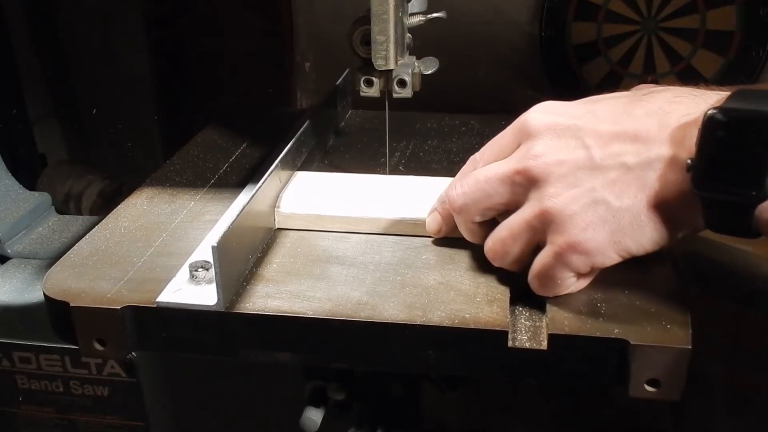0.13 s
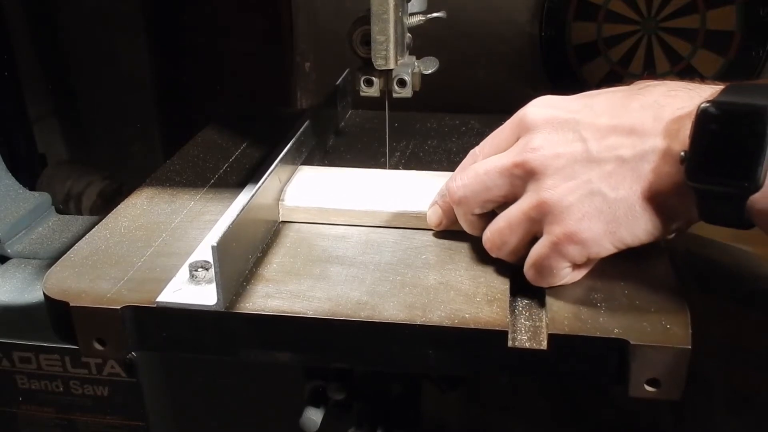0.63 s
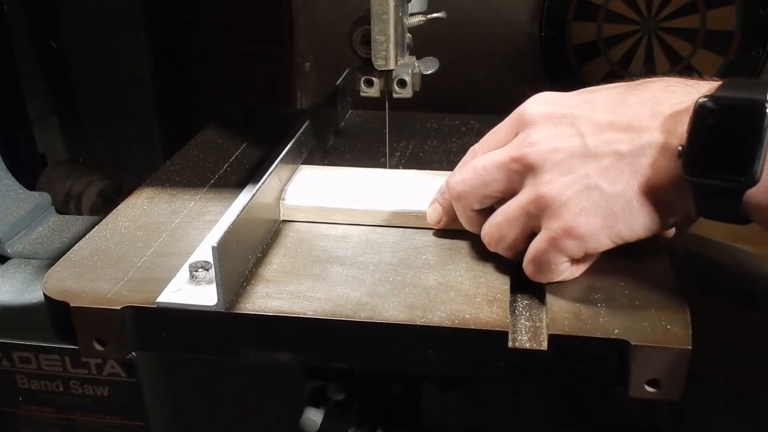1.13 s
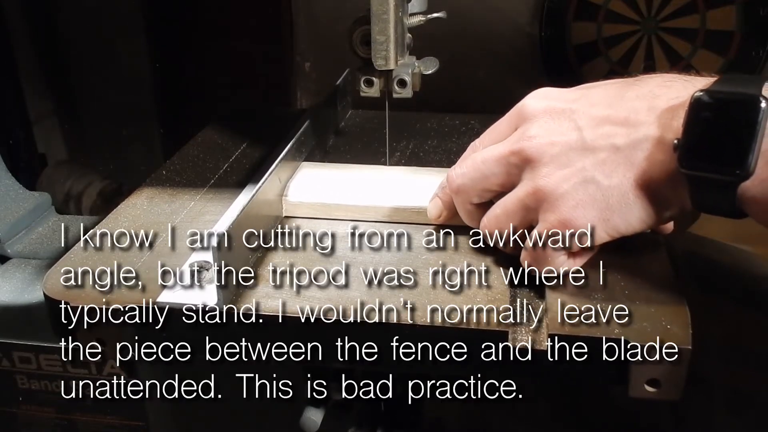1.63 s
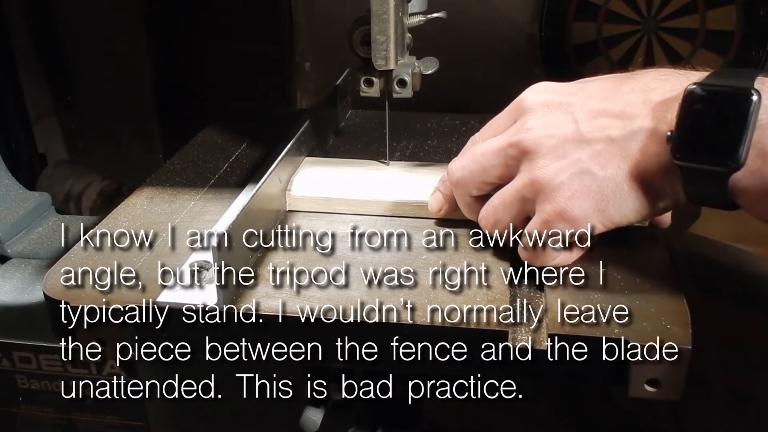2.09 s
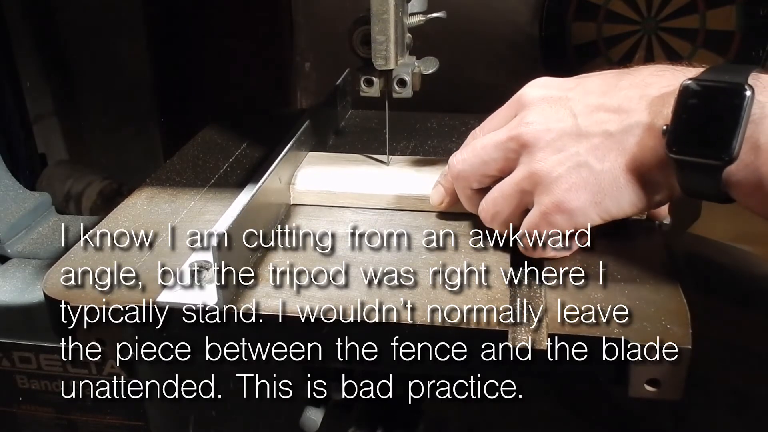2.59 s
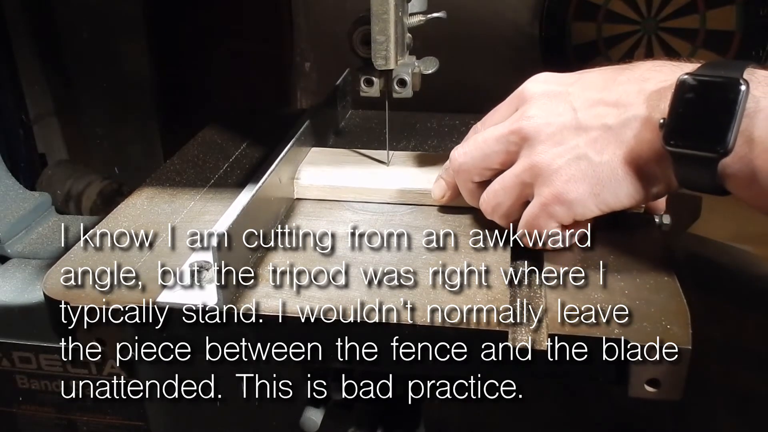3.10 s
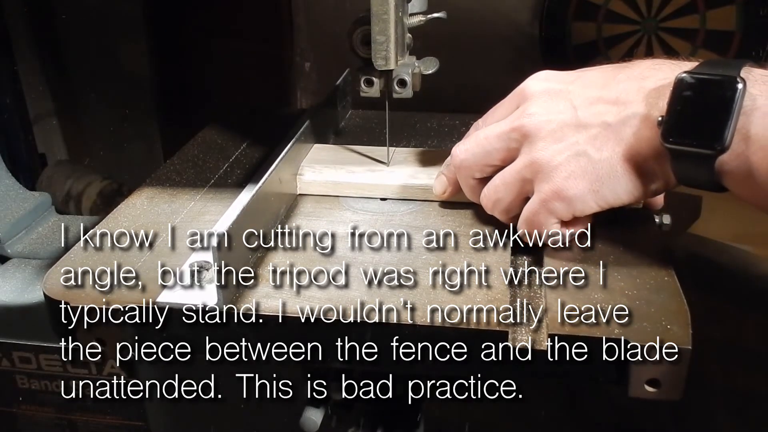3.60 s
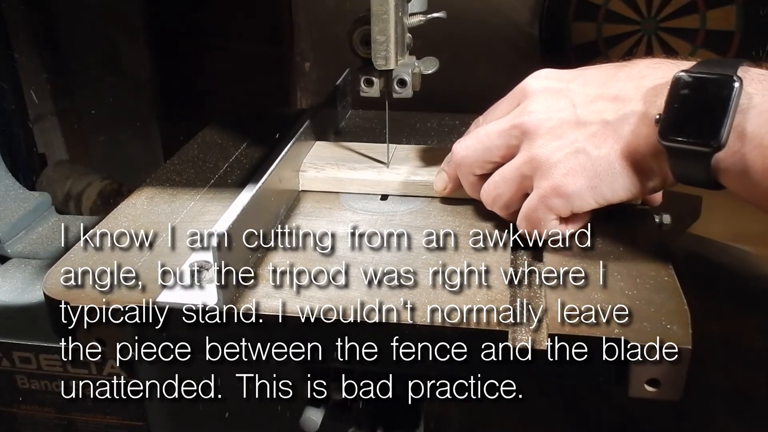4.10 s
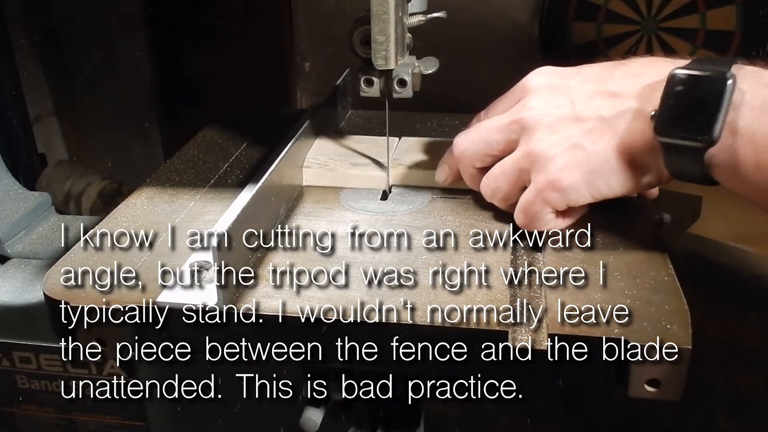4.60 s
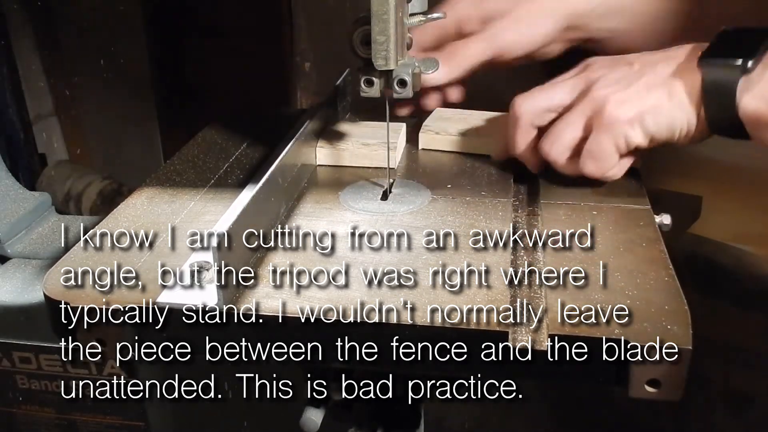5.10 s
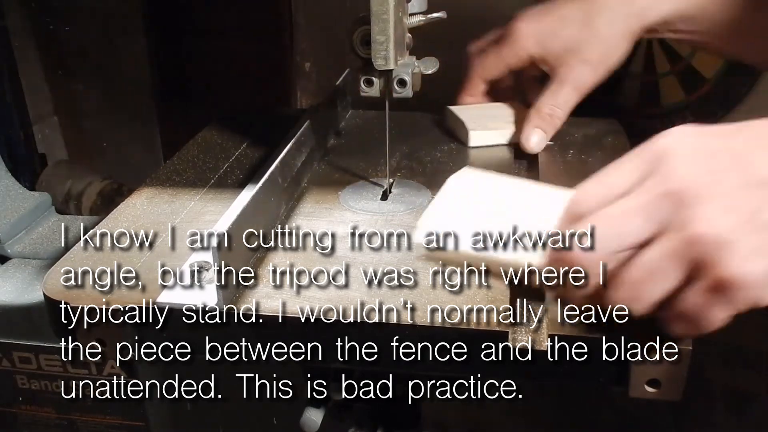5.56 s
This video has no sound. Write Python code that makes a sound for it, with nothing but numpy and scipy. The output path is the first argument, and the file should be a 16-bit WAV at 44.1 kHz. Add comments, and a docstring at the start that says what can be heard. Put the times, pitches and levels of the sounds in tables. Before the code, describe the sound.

A short swelling hum and rattly rumble of a small band saw, then a sudden long cut through wood: harsh, hissy tearing, shifting squeals and a fast flutter. The motor sinks behind it. A faint low groan comes just before the piece separates. The rasp cuts off with a short ring, the free-running machine grows louder again, and wood lightly taps the metal table. Close stereo microphone, dry room, treble slightly left.

```python
"""First a small band saw runs free: motor hum and wheel rumble ring in its frame and table, and their level
swells up. A wooden block is pushed through the blade: the teeth whine and rasp while the rumble ducks at once.
Late in the cut the block groans; then the cut rings out, the rumble's level swells again and wood taps the
table. Rumble, rasp and taps are filtered noise and ringing clicks; hum, whine and groan are wavering sines."""
import sys
import numpy as np
from scipy import signal
from scipy.fft import rfft, irfft, next_fast_len
from scipy.io import wavfile
from scipy.ndimage import uniform_filter1d

SR = 44100
rng = np.random.default_rng(int(sys.argv[2]) if len(sys.argv) > 2 else 0)


def ratio(d):
    """dB to gain"""
    e = np.asarray(d, float) / 20
    return 10 ** e


def pcm_store(signal):
    """Save signal as 16-bit PCM."""
    levels = np.round(np.clip(np.atleast_2d(signal), -1, 1) * 32767)
    wavfile.write(sys.argv[1], SR, levels.astype(np.int16).T)


N = 251476   # length in samples

BITE_S, EXIT_S = 0.596, 4.688   # the blade meets the wood; the last tooth leaves it
FREE_S = 4.95                   # the last ring of the cut is gone


def rms_one(x):
    """Scale to unit rms."""
    return x / np.sqrt(np.mean(x ** 2) + 1e-20)


def in_time(rows):
    """Turn table columns into curves over time, one value a sample; the first column is seconds."""
    s, *columns = np.transpose(rows)
    return [np.interp(np.arange(N) / SR, s, column) for column in columns]


def over_pitch(hz, points):
    """Read (Hz, value) points at any pitch, joined by straight lines on a log pitch scale."""
    point_hz, values = np.transpose(points)
    return np.interp(np.log(hz), np.log(point_hz), values)


def coloured(x, points, modes=()):
    """Filter x to a spectrum curve, with resonances or dips standing on it."""
    size = next_fast_len(N)
    hz = np.maximum(np.fft.rfftfreq(size, 1 / SR), 1)
    db = over_pitch(hz, points)
    for centre_hz, width_hz, top_db in modes:
        db = db + top_db / (1 + (2 * (hz - centre_hz) / width_hz) ** 2)
    return irfft(rfft(x, size) * ratio(db), size)[:N]


def band(x, low_hz, high_hz):
    """Keep only what lies between two pitches, with steep edges."""
    return signal.sosfilt(signal.butter(4, [low_hz, high_hz], "band", fs=SR, output="sos"), x)


def drift(rate_hz):
    """Smooth random wandering of rms 1; a higher rate wanders faster."""
    # made at one value per 40 samples, with a run-in dropped, then joined by straight lines
    r = np.exp(-80 * np.pi * rate_hz / SR)
    noise = rng.standard_normal(N // 40 + 2002)
    slow = signal.lfilter([1], [1, -2 * r, r * r], noise)[2000:]
    return np.interp(np.arange(N) / 40, np.arange(len(slow)), rms_one(slow))


def rumble_db():
    """The rumble's level swells, ducks at the bite, sinks on, creeps up, dips at the end and swells again."""
    t = np.arange(N) / SR
    swell = 20           # dB per second
    after_s, after_db = 4.726, -43.5   # bottom of the last dip
    free = -31 + swell * t
    # 3.5 dB per second of creep; the extra 11 dB just after the bite die away over 0.2 s
    ducked = -50 + 3.5 * (t - BITE_S) + 11 * np.exp(-np.abs(t - BITE_S) / 0.2)
    dip = after_db + 60 * (after_s - t)
    after = after_db + swell * (t - after_s)
    during = np.minimum(ducked, dip)
    return np.where(t < BITE_S, free, np.where(t < after_s, during, after))


# Broad colour of the rumble. Each row: pitch [Hz], relative level per Hz [dB].
RUMBLE_COLOUR = [(40, -29.5), (110, -33), (160, -16.5), (290, -3), (490, -13.5), (870, -20.5), (1120, -12),
                 (1550, -20.5), (2100, -12.5), (3100, -23), (4600, -30.5), (5600, -30), (7000, -38),
                 (16000, -46)]
# Frame and table resonances. Each row: pitch [Hz], width [Hz], rise over the broad colour [dB].
FRAME_RESONANCES = [(76, 14, 12), (241, 9, 4), (286, 22, 9.5), (430, 23, 3), (545, 26, 9.5), (625, 24, 10),
                    (1018, 16, 6), (1075, 24, 6), (1164, 13, 12.5), (1367, 24, 10.5), (2077, 24, 10),
                    (2250, 24, 7), (3198, 80, 10.5), (4540, 380, 10)]
# Pitches where reflections off the table cancel, in rumble and cut. Each row: pitch [Hz], width [Hz],
# change [dB].
TABLE_DIPS = [(2500, 70, -18), (3880, 350, -8)]
# Motor tones. Each row: pitch [Hz], average level before the shared swell [dB].
MOTOR_TONES = [(60, -53.5), (120, -24), (240, -17), (360, -5)]


def running_saw():
    """Lumpy wheel and bearing noise rings the frame; the motor hums on mains multiples; hiss follows."""
    t = np.arange(N) / SR
    rumble = coloured(rng.standard_normal(N), RUMBLE_COLOUR, FRAME_RESONANCES + TABLE_DIPS)
    low, high = band(rumble, 20, 750), band(rumble, 750, 17000)
    wobble = drift(22.3)   # shared, but stronger in the bass
    low = low * ratio(1.85 * wobble + 0.09 * drift(5.2))
    high = high * ratio(0.74 * wobble + 1.5 * drift(2.0))
    rumble = low + high
    rumble = rumble / np.std(band(rumble, 200, 450))   # this band sets the loudness
    hum = np.zeros(N)
    for hz, db in MOTOR_TONES:
        tone = np.sin(2 * np.pi * (hz * t + rng.random()))
        hum += np.sqrt(2) * ratio(db + 2.13 * drift(10.3)) * tone
    hiss = ratio(-40) * rng.standard_normal((2, N))   # separate in left and right
    level = ratio(rumble_db())
    return level * (ratio(-1.5) * rumble + hum), level * hiss


# The push on the block. Each row: time in seconds, feed as tearing level [dB],
# share of the blade buried in wood [0 to 1].
PUSH = [(.6, -32.5, 0), (.7, -28.5, 0.14), (.91, -39, 0.1), (1.2, -34, 0.14), (1.6, -35.5, 0.3),
        (1.85, -35.5, .2), (2.12, -31, 0.73), (2.55, -33, 0.52), (2.98, -29.5, 1), (3.46, -35, 0.87),
        (3.66, -34.5, 0.8), (3.9, -30, 1), (4.33, -33.5, 0.96), (4.5, -31.5, 0.6), (4.6, -29.5, 0.2),
        (4.75, -31.5, .6)]
# Hollows (minus dB) and brighter patches (plus dB) drifting through the rasp. Each row: middle [s],
# half length [s], pitch at the middle [Hz], glide [Hz per s], change [dB].
DRIFTING_HOLLOWS = [(0.66, 1, 5940, 300, -10), (.95, 0.18, 9300, 100, -11), (1.5, 0.32, 9800, 100, -9),
                    (1.85, 0.12, 12500, -4000, -10), (2.35, 0.42, 8600, -1200, -23),
                    (2.8, 0.17, 6300, 1000, -6), (2.47, 0.46, 11700, -500, -7), (0.71, .5, 11900, 95, 8),
                    (3.53, 0.34, 9300, 100, -13), (4.06, 0.38, 8400, -1500, -15),
                    (3.3, 0.77, 13000, 201, -3), (0.65, 0.12, 4500, 100, 4), (1.23, 0.99, 3160, 100, -6),
                    (3.02, 0.24, 7000, 97, 6), (4.53, 0.32, 5750, 200, 8), (4.04, 0.67, 2020, 100, 4),
                    (2.2, 0.45, 14000, 100, 9), (4.33, .4, 4000, 100, 2.5), (3.13, 0.21, 2450, 100, 2)]
# How the cut dies away. Each row: pitch [Hz], time to fall by 60 dB [s].
RING_TIMES = [(1000, .5), (4000, 0.7), (10000, 0.43)]
EXIT_DROP_DB = -17   # tearing stops at once in the treble, the ring is left


def rasp(chips):
    """Feed sets the level, a buried blade favours the wood, hollows drift by, the ring dies by pitch."""
    hz, s, spectrum = signal.stft(rms_one(chips), SR, nperseg=512, noverlap=384)
    at = np.minimum((s * SR).astype(int), N - 1)   # sample at each slice of time
    hz = hz[:, None] + 1
    feed_db, buried = in_time(PUSH)
    # below about 5340 Hz the wood is up to 7 dB weaker when the blade is not buried
    wood_db = 7 * (np.clip(buried[at], 0, 1) - 1) / (1 + (hz / 5340) ** 4)
    db = feed_db[at] + wood_db
    for middle_s, half_s, centre_hz, glide, depth_db in DRIFTING_HOLLOWS:
        off = (hz - centre_hz - glide * (s - middle_s)) / 764   # half width in Hz
        db = db + depth_db * np.exp(-off ** 2 - ((s - middle_s) / half_s) ** 4)
    # the level wanders separately in overlapping bands of pitch
    for centre_hz in range(1000, 17000, 1500):
        share = np.clip(1 - np.abs(hz - centre_hz) / 1500, 0, 1)
        db = db + 1.46 * drift(10.2)[at] * share
    t60 = np.maximum(over_pitch(hz, RING_TIMES), 0.02)
    db = db - 60 * np.maximum(s - EXIT_S, 0) / t60
    db = db + EXIT_DROP_DB * (s > EXIT_S) / (1 + (3600 / hz) ** 2)   # the sudden stop, mostly treble
    return signal.istft(spectrum * ratio(db), SR, nperseg=512, noverlap=384)[1][:N]


# Strong multiples of the tooth-group rate: one multiple per entry [number].
STRONG_MULTIPLES = [6, 9, 12]
# Their levels between squeals, in the same order: one level per entry [dB].
QUIET_WHINE_DB = [-52, -59.5, -43.5]
# Squeals, one list for each strong multiple. Each row: middle [s], half length [s], level added [dB].
SQUEAL_TIMES = [
    [(.63, .12, -43), (1.2, 0.19, -38), (1.70, 0.072, -40.5), (2.08, 0.2, -36.5), (3.12, 0.075, -40),
     (3.5, 0.15, -50), (3.86, 0.1, -43), (4.33, 0.042, -51), (4.48, 0.054, -40), (4.62, .06, -42)],
    [(.62, 0.085, -38), (.86, 0.094, -39.5), (1.3, 0.33, -38.5), (1.71, 0.18, -29), (1.97, 0.054, -40.5),
     (2.31, .1, -32), (2.8, 0.46, -38), (3.3, 0.086, -47), (3.56, 0.06, -40), (4.2, 0.69, -45),
     (4.6, 0.064, -32)],
    [(.62, 0.059, -42), (.95, 0.2, -39.5), (1.35, 0.23, -34), (1.84, 0.031, -43), (2.32, .12, -39),
     (2.6, 0.18, -38), (2.9, 0.12, -33), (3.15, 0.079, -41), (3.4, 0.081, -34.5), (3.56, 0.07, -42),
     (3.97, .12, -40), (4.25, 0.15, -43), (4.6, .07, -40)],
]
# Weak multiples. Each row: multiple [number], level as the cut begins [dB], level as it ends [dB].
WEAK_MULTIPLES = [(1, -55, -54), (2, -56, -50), (3, -57, -46), (4, -58, -51), (5, -68, -51), (7, -54, -59),
                  (8, -62, -57), (10, -51, -51), (11, -50, -53), (13, -51, -51)]


def tooth_whine(turn, throb_db):
    """The even part of the tooth train gives steady tones at whole multiples of the tooth-group rate."""
    t = np.arange(N) / SR
    levels = {}
    for multiple, quiet_db, squeals in zip(STRONG_MULTIPLES, QUIET_WHINE_DB, SQUEAL_TIMES):
        levels[multiple] = ratio(quiet_db)
        for middle_s, half_s, top_db in squeals:
            levels[multiple] = levels[multiple] + ratio(top_db) * np.exp(-((t - middle_s) / half_s) ** 2)
    # each weak one comes and goes as the set teeth share the load
    for multiple, first_db, last_db in WEAK_MULTIPLES:
        levels[multiple] = ratio(np.interp(t, [BITE_S, EXIT_S], [first_db, last_db]) + 3.0 * drift(2.5))
    # at the exit a sudden drop within 3.1 ms, then 60 dB of fall in 0.35 s
    fade_db = -60 * np.maximum(t - EXIT_S, 0) / 0.35
    fade_db += 0.81 * EXIT_DROP_DB * np.clip((t - EXIT_S) / 0.0031, 0, 1)
    whine = np.zeros(N)
    for multiple, level in levels.items():
        flutter_db = 0.4 * throb_db + 1.0 * drift(8) + 1.8 * drift(60) + 1.0 * drift(300)
        phase = multiple * turn + 0.4 * drift(150) + 2 * np.pi * rng.random()
        whine += np.sqrt(2) * level * ratio(fade_db + flutter_db) * np.sin(phase)
    return whine


# Teeth catching a hard fibre. Each row: time in seconds, jump before smoothing [dB].
FIBRE_CATCHES = [(0.595, 7), (0.758, -0.5), (.830, 2), (.915, 4.5), (1.075, 6), (2.884, 3.5), (3.038, 3.5),
                 (4.685, 2.5)]


def fibre_catches_db():
    """At a hard fibre the blade stalls, then rips: mostly a dip in level, then a jump."""
    catch_db = np.zeros(N)
    for s, db in FIBRE_CATCHES:
        catch_db[round(s * SR)] = db
    rip_db = signal.lfilter([1], [1, -np.exp(-1 / (0.0062 * SR))], catch_db)   # dies in about 6 ms
    # run backwards in time, so it builds up over about 11 ms
    stall_db = signal.lfilter([1], [1, -np.exp(-1 / (0.011 * SR))], catch_db[::-1])[::-1]
    return uniform_filter1d(rip_db - 2.1 * stall_db, size=60)


# Colour of the torn chips. Each row: pitch [Hz], relative level per Hz [dB].
CHIP_COLOUR = [(200, -32), (500, -13), (900, -10), (1500, -12), (2100, -6), (3000, -5), (4400, -5),
               (6200, -10.5), (7400, -10), (9300, -8.5), (10300, -10), (12200, -11.5), (13400, -11.5),
               (15300, -12.5), (15800, -10)]
# Block resonances under the teeth. Each row: pitch [Hz], width [Hz], rise [dB].
BLOCK_RESONANCES = [(1120, 178, 17.5), (1903, 210, 10), (2068, 32, 14.5), (2324, 210, 5), (3135, 260, 8)]
# Blade resonances. Each row: pitch [Hz], width [Hz], rise [dB].
BLADE_RESONANCES = [(4350, 200, 7), (4620, 200, 4), (5250, 300, 4), (7600, 600, 5), (8650, 250, 5),
                    (10400, 300, 4), (11600, 250, 5), (12780, 250, 5), (13930, 300, 4), (14700, 600, 4)]
# Groups of three set teeth passing the wood, slowing under load. Each row: time in seconds,
# average rate [Hz].
TOOTH_GROUP_RATE = [(.6, 1164), (1.1, 1162.3), (1.6, 1160.6), (2.4, 1159.8), (3.6, 1160.6), (5, 1160.9)]
# The blade throbs as it runs over its guide. Each row: time in seconds, depth of the main swing [dB].
THROB_DEPTH = [(.6, 0.7), (1.0, 2.0), (1.4, .9), (2.1, 0.5), (3.6, -0.5), (4.2, 1)]


def cutting():
    """Each tooth tears a chip of chance size, pulsing three times a group; whine and groan join in."""
    t = np.arange(N) / SR
    # the blade speeds and slows by 3.07 Hz once a lap, 4.5 laps a second, fastest at 0.924 s
    lap_hz = 3.07 * np.cos(2 * np.pi * 4.5 * (t - 0.924))
    rate_hz = in_time(TOOTH_GROUP_RATE)[0] + lap_hz + 0.5 * drift(22.5)
    turn = 2 * np.pi * np.cumsum(rate_hz) / SR
    spin = 2 * np.pi * 43.9 * (t - 0.9199)   # throbs per second, time of one throb
    throb_db = in_time(THROB_DEPTH)[0] * np.cos(spin) + 0.6 * np.cos(2 * spin + 0.5 * drift(1))
    tearing = rng.standard_normal(N) * ratio(3.0 * np.cos(3 * turn) + 1.0 * drift(45))
    chips = coloured(tearing, CHIP_COLOUR, BLOCK_RESONANCES + BLADE_RESONANCES + TABLE_DIPS)
    cut = rasp(chips) + tooth_whine(turn, throb_db) + block_groan()
    cut = cut * ratio(fibre_catches_db() + throb_db + 0.92 * drift(30))
    start = np.clip((t - BITE_S) / 0.00035, 0, 1)
    end = np.clip((FREE_S - t) / 0.069, 0, 1)
    return cut * start * end


# The nearly severed block. Each row: time in seconds, average pitch [Hz], average level [dB].
GROAN_PATH = [(3.95, 880, -70), (4.06, 880, -48), (4.2, 875, -50), (4.42, 870, -53), (4.56, 800, -53),
              (4.62, 760, -45), (4.69, 830, -50), (4.75, 840, -75)]


def block_groan():
    """The nearly severed block groans: one sine with wavering pitch and level."""
    hz, db = in_time(GROAN_PATH)
    phase = 2 * np.pi * np.cumsum(hz + 17.84 * drift(35.6)) / SR
    return np.sqrt(2) * ratio(db + 3.1 * drift(39)) * np.sin(phase)


# Wood tapping the table. Each row: time in seconds, strength [dB].
TAPS = [(5.171, -37), (5.675, -34)]
# Ringing of a tap. Each row: pitch [Hz], relative level [dB], time to fall by 60 dB [s].
TAP_RINGS = [(2600, -5, .05), (3050, 0, .06), (4200, -1, .06), (4450, -2, .05)]


def knocks():
    """Short wooden taps: each click sets off a few quickly dying tones."""
    clicks = np.full(N, 1e-18)
    for s, db in TAPS:
        clicks[round(s * SR)] = ratio(db)
    out = np.zeros(N)
    for hz, db, t60 in TAP_RINGS:
        r, w = ratio(-60 / (t60 * SR)), 2 * np.pi * hz / SR
        out += signal.lfilter([0, ratio(db) * np.sin(w)], [1, -2 * r * np.cos(w), r * r], clicks)
    return out


# How far left leads right. Each row: pitch [Hz], left over right [dB].
LEFT_OVER_RIGHT = [(60, 0), (2400, .2), (4400, .7), (8100, 2.4), (15000, 4.2)]
# Echoes that differ between left and right. Each row: pitch [Hz], level against the direct sound [dB].
ECHO_SPREAD = [(30, -20), (60, -23), (125, -32), (300, -46), (600, -34), (1300, -24), (2400, -29),
               (4400, -22), (8000, -26), (15000, -12)]


def scene():
    """The saw stands a little left, more so in the treble; wall echoes differ between left and right."""
    saw, hiss = running_saw()
    mid = saw + cutting() + knocks()
    left = coloured(mid, [(hz, db / 2) for hz, db in LEFT_OVER_RIGHT])
    right = coloured(mid, [(hz, -db / 2) for hz, db in LEFT_OVER_RIGHT])
    # a tenth of a second of noise, falling 60 dB in 0.03 s
    echoes = rng.standard_normal(SR // 10) * ratio(-60 * np.arange(SR // 10) / SR / 0.03)
    echoed = signal.fftconvolve(mid, echoes / np.linalg.norm(echoes))[:N]
    side = coloured(echoed, ECHO_SPREAD)
    return np.array([left + side, right - side]) + hiss


def roll_off(x):
    """The treble ends steeply here."""
    return signal.sosfilt(signal.butter(12, 16460, fs=SR, output="sos"), x)


def record(dry):
    """Round the peaks, then cut the deepest bass and the very top."""
    ceiling = 0.4   # no peak passes this before the filters
    rounded = ceiling * np.tanh(dry / ceiling)
    bass_cut = signal.butter(2, 40, "high", fs=SR, output="sos")
    top_cut = signal.ellip(10, 0.5, 60, 15720, fs=SR, output="sos")
    finished = signal.sosfilt(top_cut, signal.sosfilt(bass_cut, rounded))
    return roll_off(finished)


dry = scene()
out = record(dry)
pcm_store(out)
```